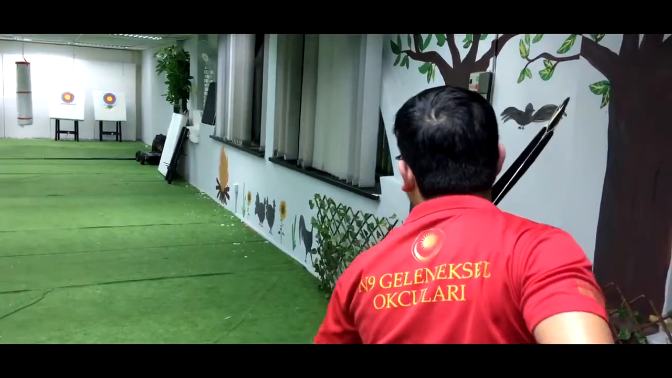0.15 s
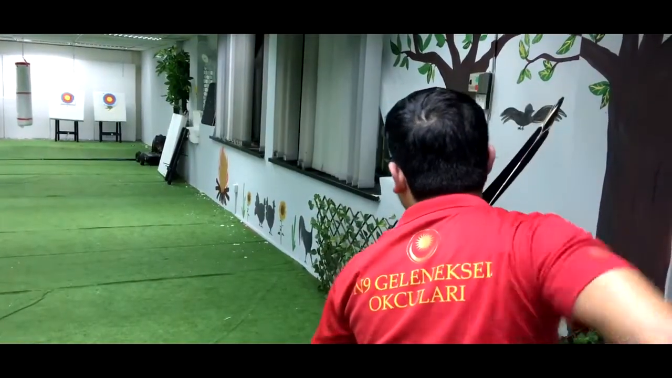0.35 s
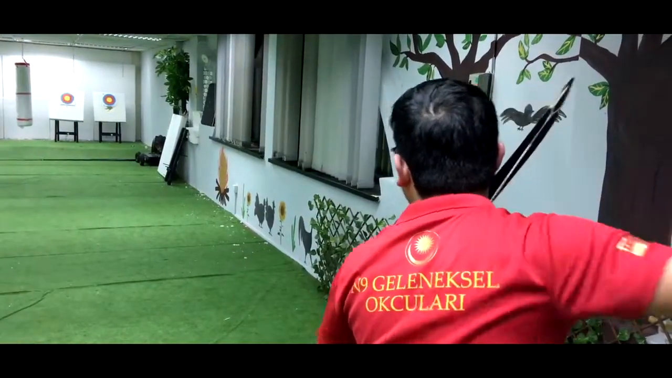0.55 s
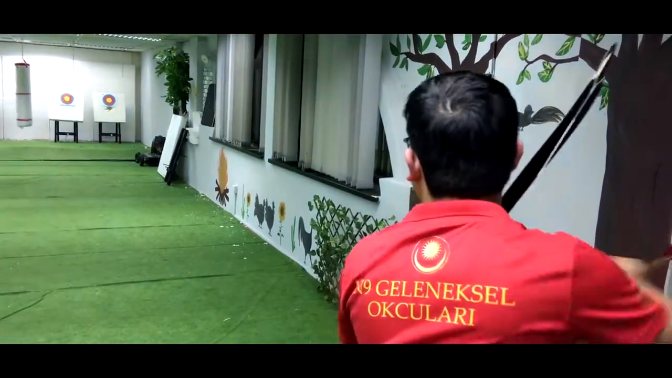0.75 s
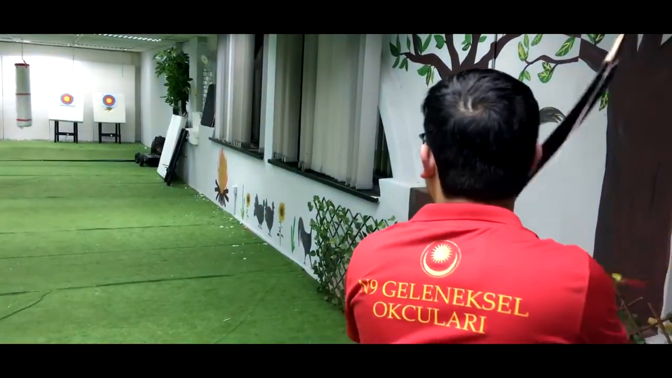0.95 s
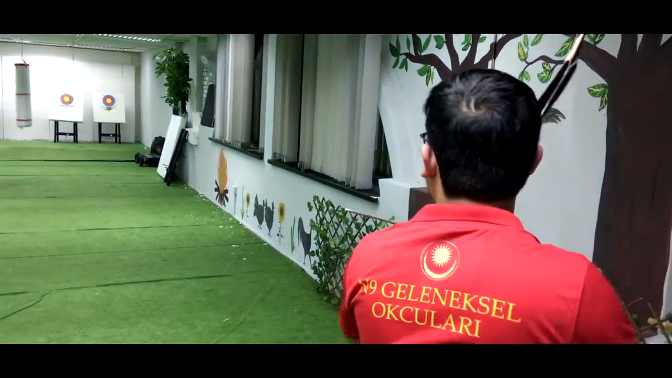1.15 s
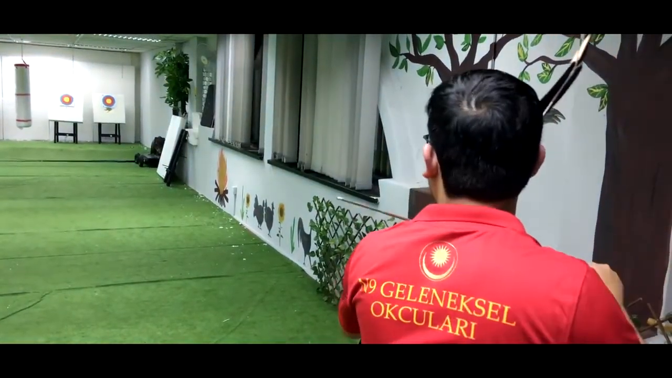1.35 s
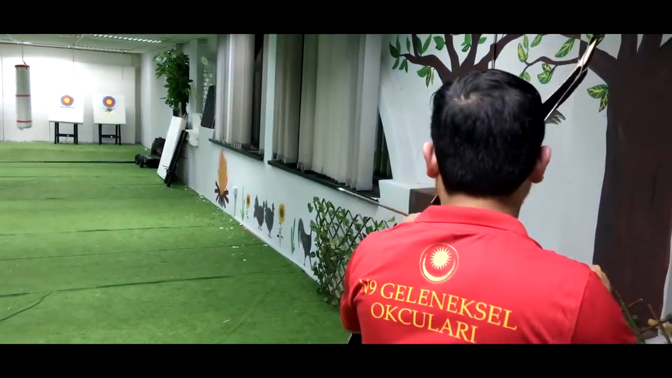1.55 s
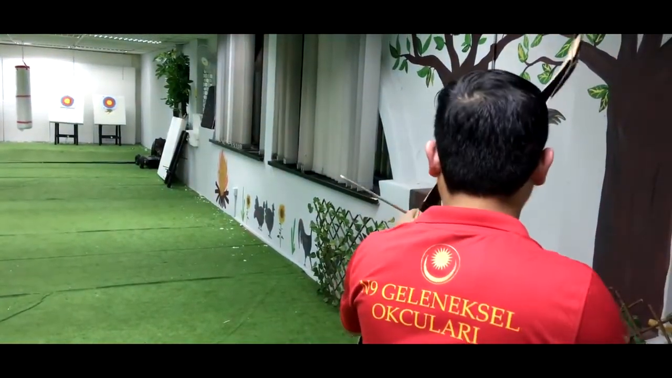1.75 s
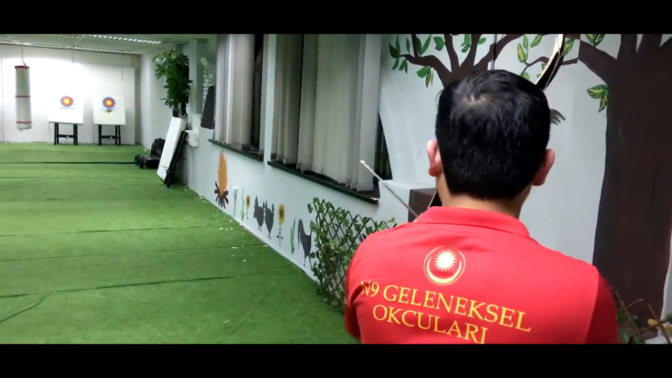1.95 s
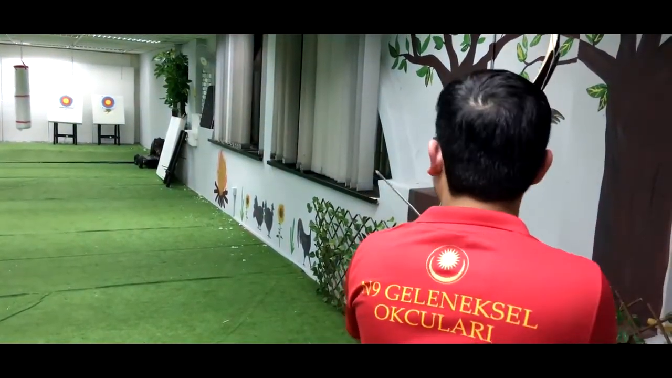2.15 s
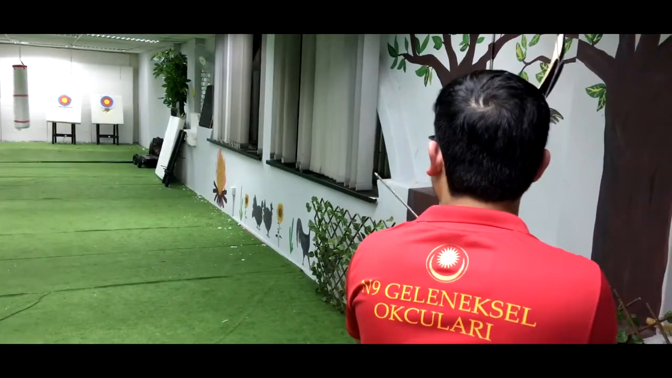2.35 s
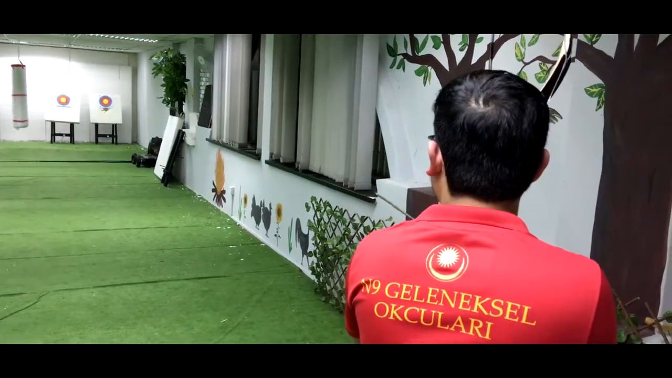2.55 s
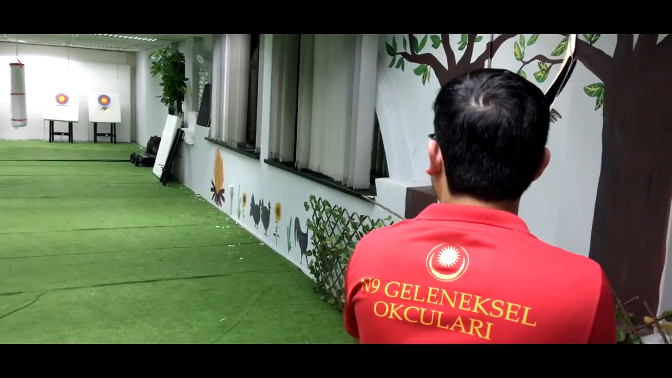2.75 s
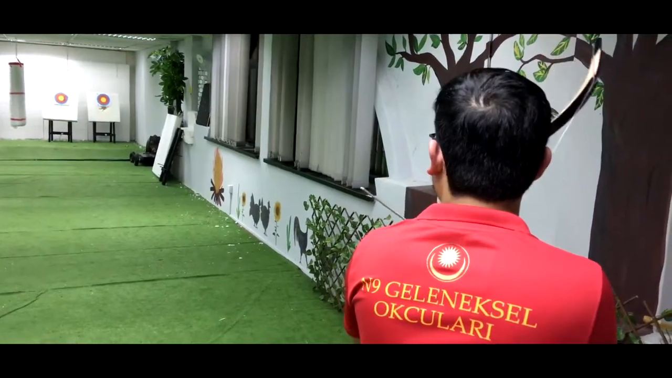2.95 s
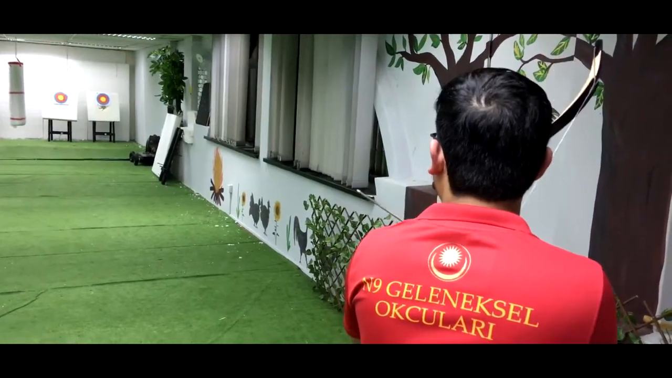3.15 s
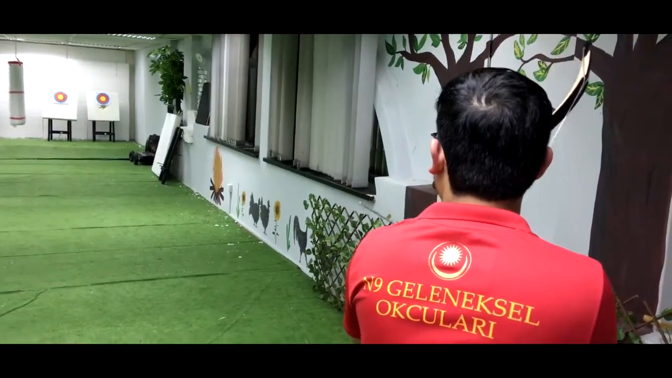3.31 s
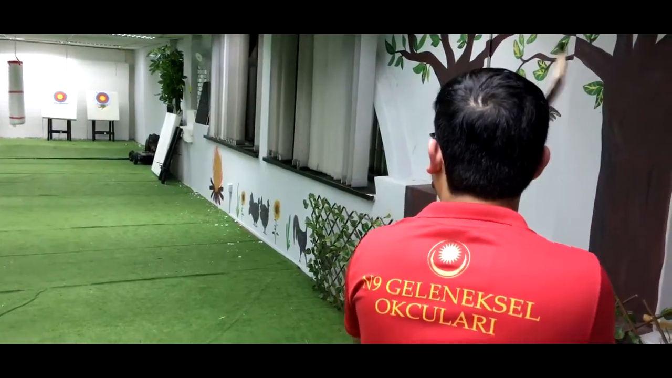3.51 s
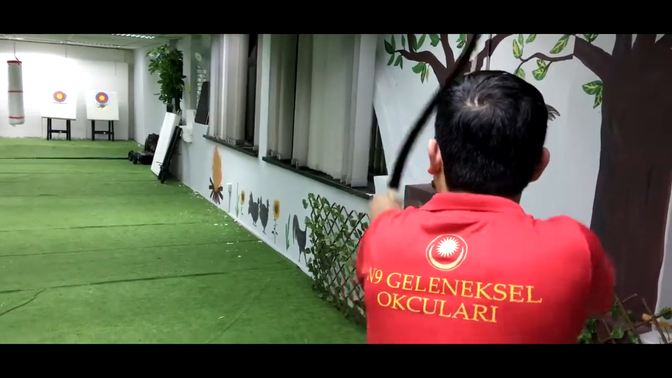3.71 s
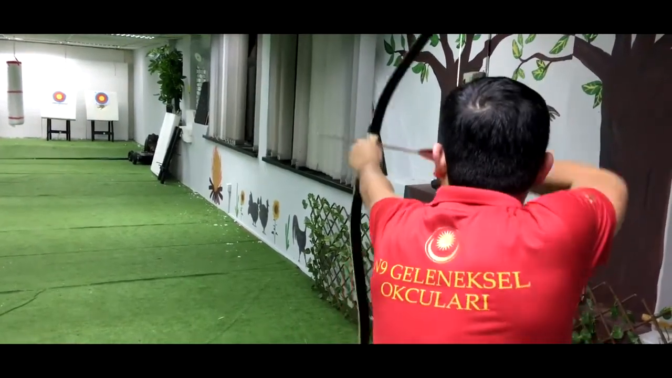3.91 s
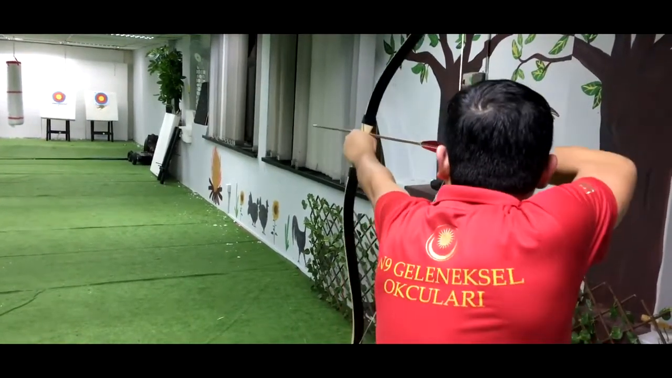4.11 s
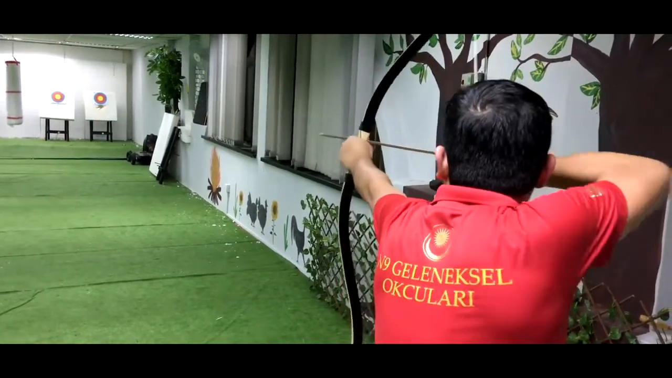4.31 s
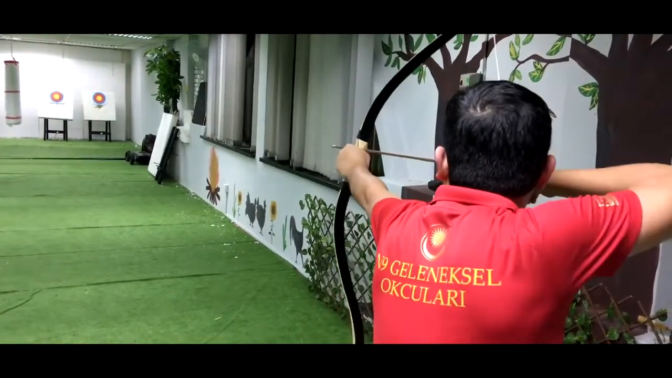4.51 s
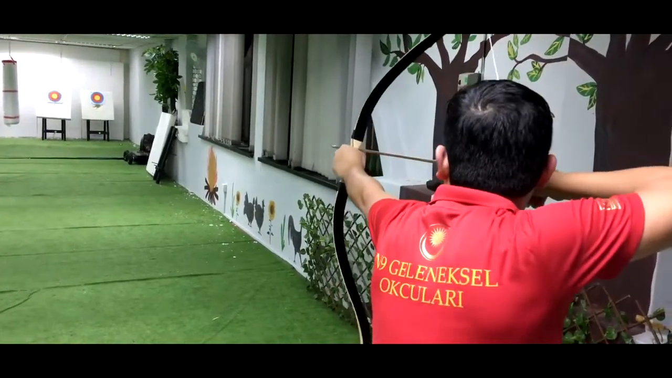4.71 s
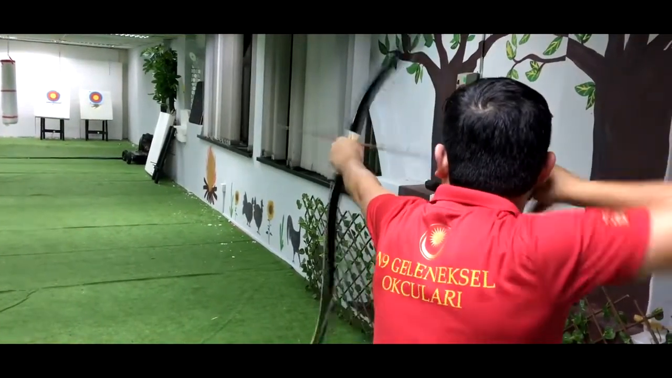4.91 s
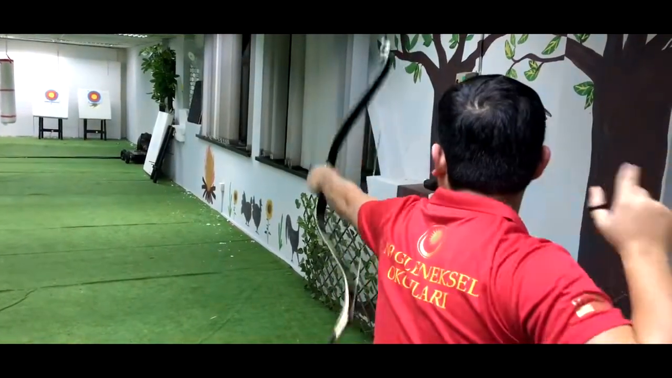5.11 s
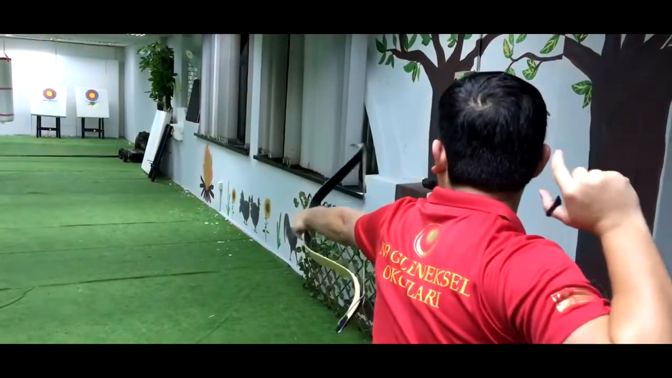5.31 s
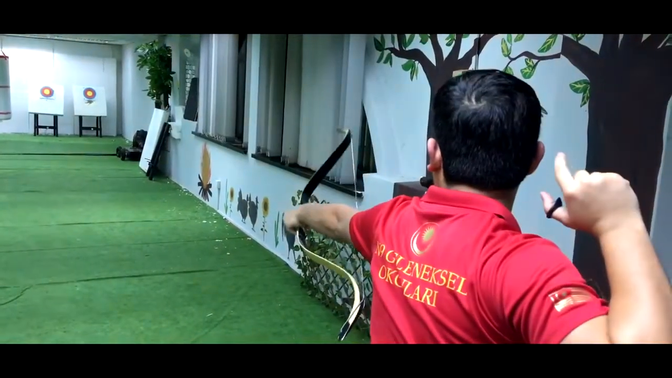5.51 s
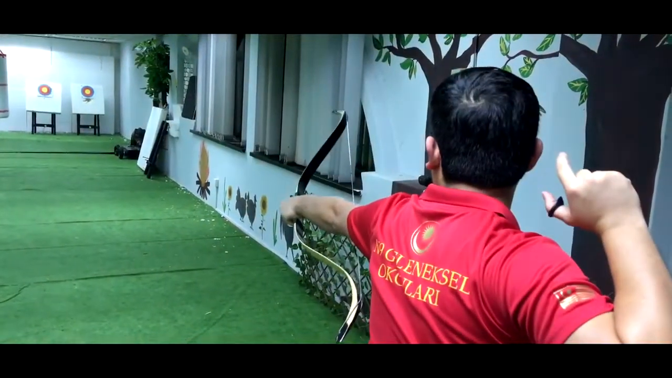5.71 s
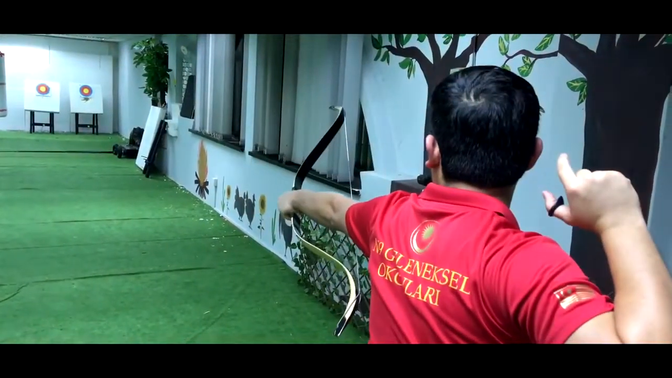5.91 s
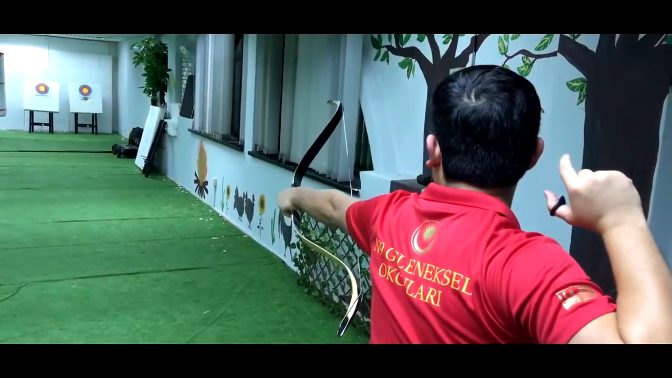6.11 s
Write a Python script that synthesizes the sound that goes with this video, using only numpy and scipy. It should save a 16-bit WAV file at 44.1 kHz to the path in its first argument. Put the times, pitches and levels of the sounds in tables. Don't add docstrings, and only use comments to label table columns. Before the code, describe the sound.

A small microphone close to an archer picks up crisp, irregular rattling as an arrow leaves the quiver, over deep fan hum and a distant motor. It grows quiet except for soft ticks of arrow on bow. The released string cracks violently, limbs shuddering, then a distorted thud and crack comes from the foam block down the hall, with echo fading into the hum.

```python
import sys
import numpy as np
from scipy import signal
from scipy.fft import rfft, irfft, next_fast_len
from scipy.io import wavfile
from scipy.ndimage import uniform_filter1d

SR = 44100
rng = np.random.default_rng(int(sys.argv[2]) if len(sys.argv) > 2 else 0)


def wav_out(sig):
    wavfile.write(sys.argv[1], SR, np.round(np.clip(np.atleast_2d(sig).T, -1, 1) * 32767).astype(np.int16))


def amplitude_ratio(level_db):
    exponent = np.asarray(level_db, float) / 20
    return 10 ** exponent


N = 276066


def evened(x):
    return x / np.sqrt(np.mean(x ** 2) + 1e-20)


def read(points, hz):
    f, value = np.transpose(points)
    return np.interp(np.log(hz + 1), np.log(f + 1), value)


def colour(x, gain):
    size = next_fast_len(len(x))
    spectrum = rfft(x, size) * gain(np.fft.rfftfreq(size, 1 / SR))
    return irfft(spectrum, size)[:len(x)]


def add(mix, s, sound):
    part = mix[round(s * SR):][:len(sound)]
    part += sound[:len(part)]


def burst(db, hz, octaves, rise, t60, grit_db=2.5):
    t = np.arange(SR // 3) / SR
    grit, noise = rng.standard_normal((2, len(t)))
    band = colour(noise, lambda f: np.exp(-0.5 * (np.log2((f + 1) / hz) / octaves) ** 2))
    roughness_db = grit_db * evened(uniform_filter1d(grit, size=24))
    envelope = (1 - np.exp(-t / rise)) * amplitude_ratio(-60 * t / t60)
    return amplitude_ratio(db + roughness_db) * evened(band) * envelope


def struck(rows, onset):
    out = np.zeros(N)
    for s, db, hz, octaves, t60 in rows:
        add(out, s, burst(db, hz, octaves, onset * t60, t60))
    return out


def waver():
    return evened(colour(rng.standard_normal(N), lambda f: 1 / (1 + (f / 2.5) ** 4)))


def tone(hz, db):
    waver_db, waver_hz = 3.5, 0.8
    level = np.sqrt(2) * amplitude_ratio(db + waver_db * waver())
    cycles = np.cumsum(hz + waver_hz * waver()) / SR
    return level * np.sin(2 * np.pi * cycles)


# frequency in Hz, level in dB per Hz.
AIR_SPECTRUM = [(15, -47), (25, -22), (38, -30), (82, -2.5), (174, -12.5), (233, -11), (322, -20),
                (445, -21.5), (523, -27.5), (583, -26), (805, -27.5), (1340, -27), (4880, -43.5),
                (6060, -43.5), (15500, -46.5)]
# frequency in Hz, width in Hz, level in dB.
DUCT_MODES = [(74, 27.7, -5), (86, 10, -9), (231, 26, -20), (985, 43, -27.5), (1990, 200, -33.5)]
# time in seconds, level in dB.
FAN_LOAD = [(0.0, -29), (1.39, -29.5), (1.87, -27.5), (2.67, -27.5), (2.98, -26), (3.45, -28), (4.43, -26),
            (4.57, -29), (4.78, -28), (5.44, -25), (5.68, -28.5), (6.26, -29.5)]


def ventilation():
    hiss_share, size, hop = 0.12, 2048, 512
    hz = np.fft.rfftfreq(size, 1 / SR)[:, None]
    frames = N // hop + 6
    a, b, patches = rng.standard_normal((3, len(hz), frames))
    patches = uniform_filter1d(patches, size=6, axis=0)
    patches = evened(uniform_filter1d(patches, size=8, axis=1))
    s, load_db = np.transpose(FAN_LOAD)
    swell_db = np.interp(np.arange(frames) * hop / SR, s, load_db - load_db.mean())
    low = 1 / (1 + (hz / 390) ** 4)
    level_db = (low + (1 - low) * hiss_share) * swell_db + (1 - low) * 0.59
    power = amplitude_ratio(read(AIR_SPECTRUM, hz) - 0.5) ** 2
    for f, width, db in DUCT_MODES:
        power = power + amplitude_ratio(db) ** 2 / (1 + (2 * (hz - f) / width) ** 4)
    z = (a + 1j * b) * np.sqrt(power) * amplitude_ratio(level_db + 0.97 * patches)
    noise = signal.istft(z, nperseg=size, noverlap=size - hop)[1][:N]
    return amplitude_ratio(-26.5) * evened(noise)


# frequency in Hz, level in dB.
FAN_HUMS = [(72, -36.5), (228, -44), (310, -50), (350, -51)]


def fan():
    return sum(tone(hz, db) for hz, db in FAN_HUMS)


# time in seconds, firing rate in Hz, level in dB.
ENGINE_SPEED = [(0, 36.93, -38.5), (0.699, 37.5, -32.5), (1.3, 38.53, -35), (2.0, 41.01, -31.5),
                (2.6, 40.97, -31.5), (3.05, 43.02, -29), (3.35, 47.24, -31), (3.95, 47.08, -32.5),
                (4.45, 44, -31.5), (4.8, 42.93, -41), (6.26, 43, -44)]
# multiple of the firing rate, level in dB.
ENGINE_ORDERS = [(2, -0.5), (3, -8), (4, -17), (5, -15), (6, -11)]


def engine():
    s, rate_hz, db = np.transpose(ENGINE_SPEED)
    t = np.arange(N) / SR
    rate, level_db = np.interp(t, s, rate_hz), np.interp(t, s, db)
    return sum(tone(round(k) * rate, g + level_db) for k, g in ENGINE_ORDERS)


# start in seconds, length in seconds, level in dB.
STROKES = [(0, 0.068, -32), (.066, .12, -38), (.39, 0.075, -34), (0.446, 0.066, -22), (1.138, 0.16, -34.5)]
# frequency in Hz, level in dB per Hz.
RUB_SPECTRUM = [(1000, -34), (2500, -6), (4000, 1), (6500, -4), (9500, -4), (15500, -22)]


def brushing():
    t = np.arange(N) / SR
    noise = evened(colour(rng.standard_normal(N), lambda f: amplitude_ratio(0.54 * read(RUB_SPECTRUM, f))))
    level = np.zeros(N)
    for s, length, db in STROKES:
        level += amplitude_ratio(db) * np.sin(np.pi * np.clip((t - s) / length, 0, 1))
    return amplitude_ratio(-6) * level * noise


# time in seconds, peak level in dB, centre in Hz.
SHARP_CONTACTS = [(.006, -27, 9200), (.032, -21.5, 14100), (.038, -19, 5500), (.067, -7, 7000),
                  (0.068, -3.5, 5570), (.077, -15, 12000), (.114, -11, 13000), (.165, -20, 7000),
                  (.253, -18, 3500), (.29, -11, 5500), (.5022, -6, 6000), (.7432, -10, 6500),
                  (.799, -10, 6500), (.809, -21, 8500), (.947, -1.5, 4660), (.954, -10.5, 6500)]


def ticks():
    out, width_hz = np.zeros(N), 3200
    for s, db, hz in SHARP_CONTACTS:
        add(out, s, burst(db - 8, hz, width_hz / hz * 1.26, rise=0.0001, t60=0.01, grit_db=0))
    return out


# time in seconds, peak level in dB, centre in Hz,
# spread in octaves, decay time t60 in seconds.
CLATTERS = [(.068, -8, 5800, .5, .04), (.075, -15, 6300, 0.88, 0.088), (.167, -15.5, 6400, 0.88, 0.083),
            (.193, -26, 6000, .3, .05), (.291, -3.5, 5000, 0.11, 0.031), (0.4518, -11, 5640, 0.65, .11),
            (0.5009, -2, 4300, .3, .036), (.505, 2, 5100, 0.44, 0.05), (.507, -7.5, 9200, .4, 0.097),
            (.745, -9.5, 5400, 0.64, 0.023), (0.753, -9, 6560, 0.55, 0.12), (.802, -17, 6400, .6, 0.059),
            (.868, -24, 5700, 0.44, 0.074), (.953, -12, 6260, 0.58, 0.032)]
# frequency in Hz, level in dB, decay time t60 in seconds.
SHAFT_MODES = [(1600, -3, .04), (2950, -5, .025), (3980, 1, .025), (4570, 0, .022), (5150, -2, .018),
               (5750, -4, .018), (6500, -1, .018), (7010, -4, .018), (7640, -5, .015), (8600, -4, .015),
               (9760, -4, .015)]


def clattering():
    out, t = np.zeros(N), np.arange(SR // 10) / SR
    for s, db, hz, octaves, t60 in CLATTERS:
        clatter = burst(db - 13.5, hz, octaves, rise=0.0012, t60=t60, grit_db=2.8)
        modes = np.zeros(len(t))
        for f, g, ring_s in SHAFT_MODES:
            detune = rng.uniform(0.99, 1.01)
            mode_db = g - 60 * t / ring_s - 9 * np.log2(f / hz) ** 2
            modes += amplitude_ratio(mode_db) * np.sin(2 * np.pi * f * detune * t)
        ringing = signal.fftconvolve(clatter, modes)[:len(clatter)]
        add(out, s, clatter + amplitude_ratio(-28.5) * ringing)
    return out


# time in seconds, peak level in dB, centre in Hz.
WALL_BUMPS = [(.292, -28.5, 3000), (.506, -23, 2130), (.75, -31, 2500), (.9475, -24.5, 1802),
              (.954, -24, 2800)]


def bumping():
    out = np.zeros(N)
    for s, db, hz in WALL_BUMPS:
        add(out, s, burst(db, hz, octaves=0.7, rise=0.0012, t60=0.11, grit_db=2.8))
    return out


# time in seconds, level in dB, centre in Hz,
# spread in octaves, decay time t60 in seconds.
SOFT_TOUCHES = [(.411, -40, 7000, 1.2, .06), (2.045, -38, 10000, 1.2, .11), (2.169, -33, 3700, .31, .084),
                (2.68, -43, 3700, .3, .36), (3.047, -35, 6200, 0.67, .07)]


def touching():
    return struck(SOFT_TOUCHES, onset=0.039)


# time in seconds, level in dB, centre in Hz,
# spread in octaves, decay time t60 in seconds.
THUMB_SLIP = [
    (4.9775, -9, 1820, 0.88, .043),
    (4.979, -17, 8000, 1.2, 0.046),
    (4.9825, -8, 12000, .7, 0.027),
    (4.988, -16, 4200, .7, 0.063),
]
STRING_SLAP = [
    (4.9945, 4.5, 3600, 1.3, 0.032),
    (4.999, 1.5, 5370, 0.42, .11),
    (4.999, -4, 8900, 0.65, 0.17),
    (4.996, -5.5, 2400, 1.27, .13),
]
# frequency in Hz, level in dB per Hz.
STRING_SPECTRUM = [(150, -20), (300, 5), (1000, 0), (2700, -7), (6000, -6.5), (9500, -2.5), (15500, -9)]


def string():
    bursts = struck(THUMB_SLIP, onset=0.04) + struck(STRING_SLAP, onset=0.025)
    return colour(bursts, lambda f: amplitude_ratio(0.38 * read(STRING_SPECTRUM, f)))


# level in dB, centre in Hz, spread in octaves,
# decay time t60 in seconds.
LIMB_MODES = [(-19, 235, 0.63, 0.21), (-21, 540, .17, .3), (-19.5, 870, 0.095, 0.15),
              (-24, 1220, 0.15, 0.17), (-17, 2400, .25, 0.11)]


def limbs():
    slap_s = 4.993
    return struck([(slap_s, *row) for row in LIMB_MODES], onset=0.04)


# time in seconds, level in dB, centre in Hz,
# spread in octaves, decay time t60 in seconds.
ARROW_IMPACT = [
    (5.37, 1.5, 4930, 2, .027),
    (5.374, -3.5, 2980, 1.22, .079),
    (5.38, -6, 690, 1.14, 0.086),
]
# frequency in Hz, level in dB per Hz.
IMPACT_SPECTRUM = [(150, 0), (400, 8), (1000, -3.5), (2000, -0.5), (3200, 6), (4800, -2), (5800, 2),
                   (9000, -6.5), (15500, -6)]


def impact():
    return colour(struck(ARROW_IMPACT, onset=0.027), lambda f: amplitude_ratio(0.43 * read(IMPACT_SPECTRUM, f)))


# time in seconds, frequency in Hz, level in dB, length in seconds.
FOAM_BOOM = [
    (5.372, 153.5, -1.5, 0.033),
    (5.37, 545, -12.5, 0.026),
    (5.375, 402, -10.5, 0.033),
    (5.38, 702, -13.5, 0.043),
    (5.47, 176.6, -15, 0.069),
    (5.51, 384, -22, 0.066),
]


def booming():
    out = np.zeros(N)
    for s, hz, db, length in FOAM_BOOM:
        t = np.arange(0, length, 1 / SR)
        add(out, s, amplitude_ratio(db) * np.sin(np.pi * t / length) * np.sin(2 * np.pi * hz * t))
    return out


# time in seconds, level in dB, centre in Hz,
# spread in octaves, decay time t60 in seconds.
STAND_SHAKES = [(5.40, -17.5, 500, 0.48, 0.32), (5.375, -16.5, 1100, 0.14, 0.27),
                (5.42, -18, 260, 0.44, 0.39), (5.48, -26, 560, 0.57, 0.39)]


def stand():
    return struck(STAND_SHAKES, onset=0.047)


# frequency in Hz, decay time t60 in seconds.
HALL_DECAY = [(150, 0.77), (500, 0.9), (1500, 0.49), (4000, 0.63), (7000, .58), (9500, 0.63), (11000, 0.43),
              (15000, 0.31)]


def tail():
    taps, slots = np.zeros(SR), np.arange(300, SR - 20, 16)
    places = slots + rng.integers(0, 16, len(slots))
    taps[places] = rng.choice([-1.0, 1.0], len(slots))
    hz, t, z = signal.stft(taps, SR, nperseg=256)
    decay = amplitude_ratio(-60 * t / read(HALL_DECAY, hz)[:, None])
    out = signal.istft(z * decay, SR, nperseg=256)[1]
    return out / np.linalg.norm(out)


# delay in seconds, level in dB.
WALL_ECHOES = [(.0021, -13.5), (.0075, -17), (.011, -5), (.018, -35), (.026, -30)]


def hall(x):
    stir_hz, out = 23, np.zeros(N)
    turn = 2 * np.pi * stir_hz * np.arange(N) / SR
    for k in range(3):
        feed = np.sqrt(2 / 3) * np.cos(turn + 2 * np.pi * k / 3)
        out += signal.fftconvolve(x * feed, tail())[:N]
    for s, db in WALL_ECHOES:
        add(out, s, amplitude_ratio(db) * x)
    return out


def scene():
    background = ventilation() + fan() + engine()
    near = brushing() + ticks() + clattering() + bumping() + touching()
    shot = string() + limbs()
    boom = booming()
    far = impact() + stand()
    wet = hall(amplitude_ratio(-7) * near) + hall(amplitude_ratio(-5) * shot) + hall(amplitude_ratio(-4.5) * far + amplitude_ratio(-11) * boom)
    return (background + near + shot + far + boom + wet)[None]


def band_limit(x):
    return signal.sosfilt(signal.butter(12, 15690, fs=SR, output="sos"), x)


# frequency in Hz, width in Hz, level in dB.
PORT_MODES = [(4950, 250, -3.5), (6200, 700, 1.5), (7700, 350, -2), (10500, 400, -4), (11600, 500, 1.5)]


def record(dry):
    def port(f):
        return amplitude_ratio(sum(db * np.exp(-0.5 * ((f - hz) / width) ** 2) for hz, width, db in PORT_MODES))

    heard = np.clip(colour(dry[0], port), -0.93, 0.93)
    return band_limit(heard[None])


dry = scene()
out = record(dry)
wav_out(out)
```